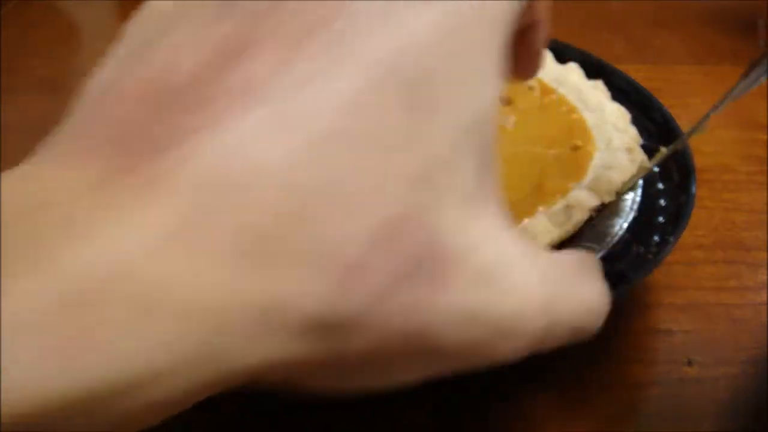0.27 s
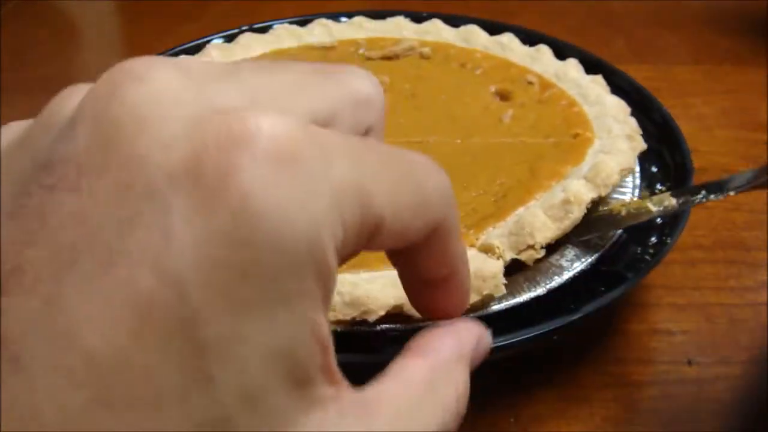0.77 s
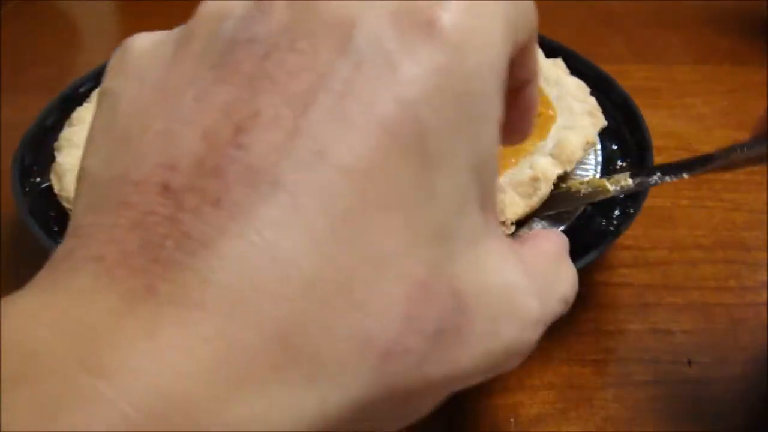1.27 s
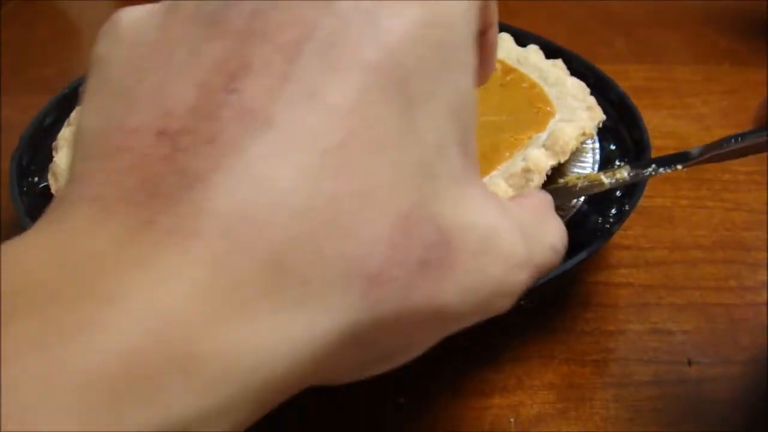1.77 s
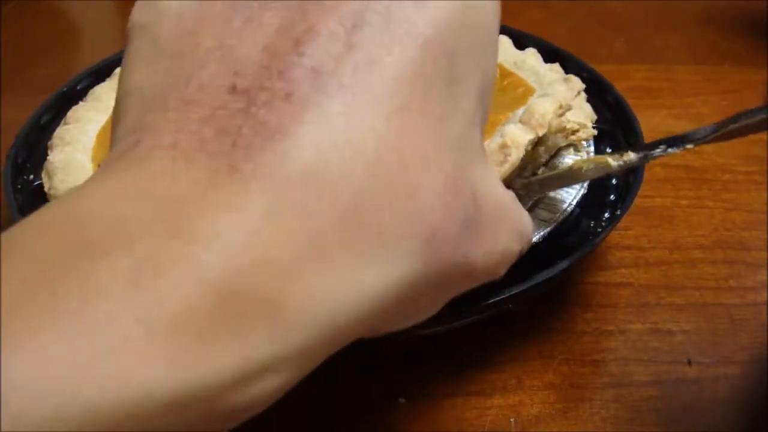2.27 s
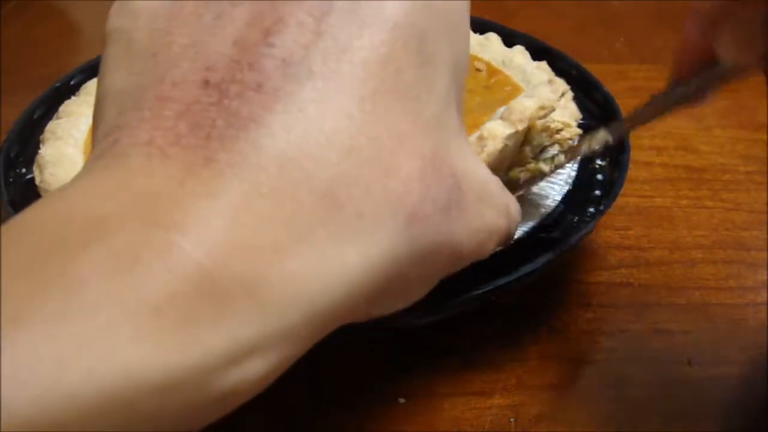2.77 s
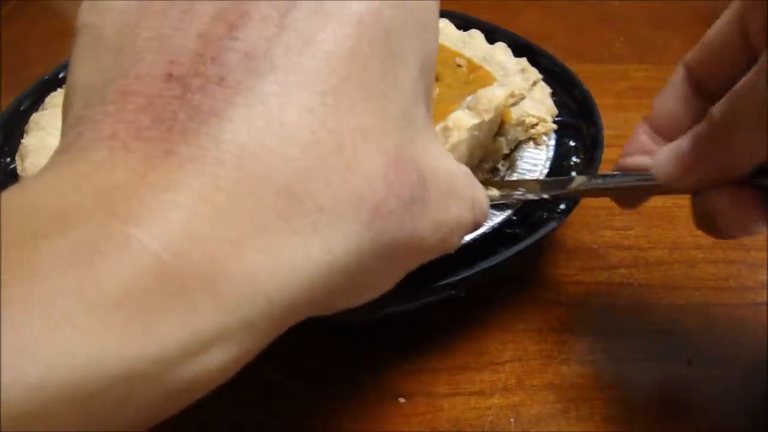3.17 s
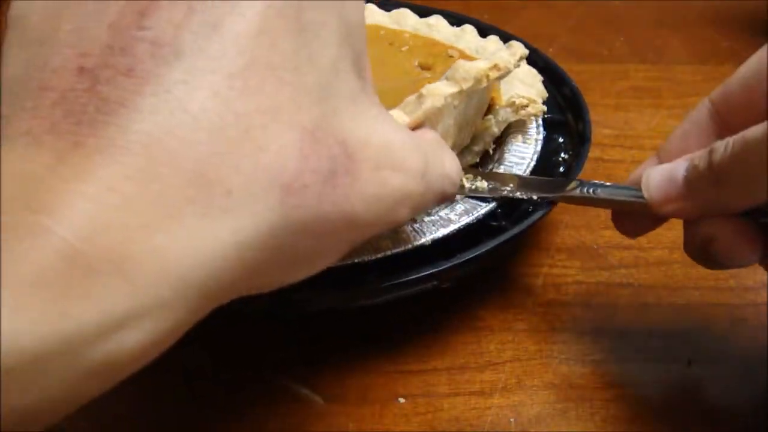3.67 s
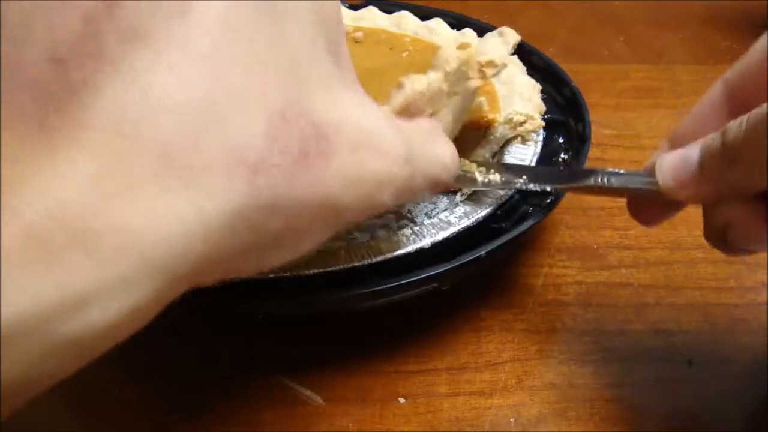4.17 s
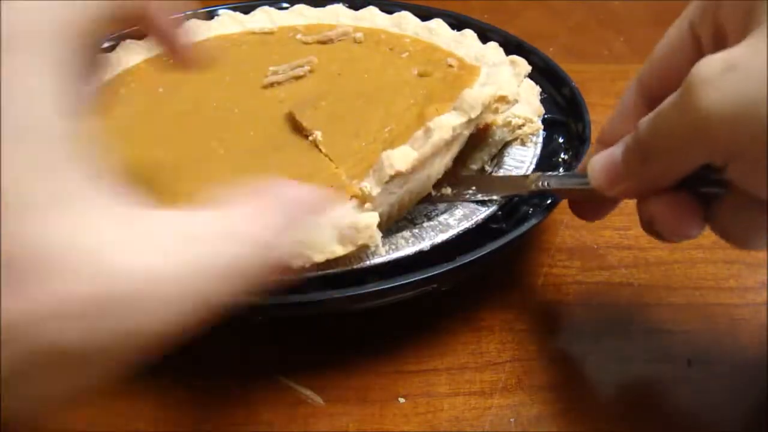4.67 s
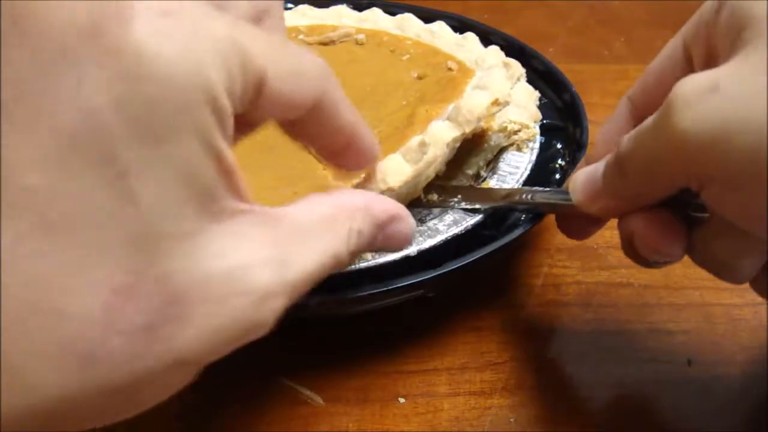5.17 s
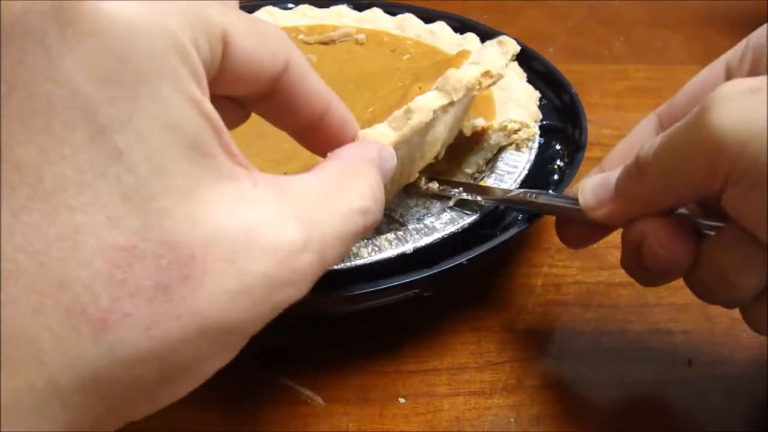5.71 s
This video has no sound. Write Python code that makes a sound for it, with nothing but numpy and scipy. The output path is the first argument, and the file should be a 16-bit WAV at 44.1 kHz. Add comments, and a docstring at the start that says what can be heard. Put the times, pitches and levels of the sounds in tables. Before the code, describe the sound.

A knife works under a pie in a foil pan on a plastic tray, heard very close in a quiet, lightly reverberant room. Small tinny taps and gritty scrapes come in clusters, then two hard clanks just before three seconds, a long soft scrape, crisp foil ticks around four seconds, the loudest clack shortly after, another knock, then near quiet.

```python
"""Hiss and hum of a quiet room, then scrapes, taps and snaps: a knife under a pie in a foil pan on a plastic tray.
Blade: stick-slip clicks and single blows drive the damped modes of the pan, which colour both.
Foil unsticks in bright decaying ticks; dull low thumps come at the loudest blows and about 37 ms after them;
the tray groans in soft low tones. Hiss is shaped noise; appliance hum is wavering sines.
A small camera close by clips and cuts the top."""
import sys
import numpy as np
from scipy import signal
from scipy.fft import rfft, irfft
from scipy.io import wavfile
from scipy.ndimage import uniform_filter1d

SR = 44100
rng = np.random.default_rng(int(sys.argv[2]) if len(sys.argv) > 2 else 0)


def master_out(mix):
    """Clip the mix to full scale and print it as 16-bit PCM to the path in sys.argv[1]."""
    frames = np.transpose(np.atleast_2d(mix))
    ceiling = np.clip(frames, -1, 1)
    pcm = np.round(ceiling * 32767).astype(np.int16)
    wavfile.write(sys.argv[1], SR, pcm)


N = 262159


def undb(db):
    """dB to gain."""
    return 10 ** (np.asarray(db) / 20)


def unit(x):
    """Scale to rms 1."""
    return x / np.sqrt(np.mean(x ** 2))


def add(out, x, start_s):
    """Mix x into out from start_s."""
    i = int(start_s * SR)
    out[i:i + len(x)] += x[:N - i]


def walk(rate_hz):
    """Random levels, one per 1 / rate_hz, slewed; rms near 1."""
    step = int(SR / rate_hz)
    held = np.repeat(rng.standard_normal(N // step + 1), step)
    return unit(uniform_filter1d(held, step)[:N])


def decay(t, tau_s):
    """Exponential decay."""
    return np.exp(-t / tau_s)


# room and microphone hiss spectrum: [f/Hz, relative density/dB]
HISS_SPECTRUM = [(25, -19), (50, -17), (100, -10), (160, -4), (250, 1.5), (500, 2), (1000, -2.5),
                 (1600, -0.5), (2050, -9.5), (3200, -8.5), (5000, -12), (8000, -13.5), (11000, -17)]
HISS_DB_RMS = -53.5


def hiss():
    """Noise shaped by a smooth spectrum; its level breathes."""
    f_hz, density_db = np.transpose(HISS_SPECTRUM)
    bin_hz = np.fft.rfftfreq(N, 1 / SR) + 1  # +1 avoids log(0)
    gain = undb(np.interp(np.log(bin_hz), np.log(f_hz), density_db))
    noise = unit(irfft(rfft(rng.standard_normal(N)) * gain, N))
    return noise * undb(HISS_DB_RMS + 0.5 * walk(2.98))


# steady appliance tones: [f/Hz, mean level/dB rms]
HUM_TONES = [(120, -70), (240, -70), (1200, -71), (1920, -71), (2040, -64), (7854, -73.5), (7881, -80)]


def hum():
    """Sines wavering slightly in pitch and level."""
    out = np.zeros(N)
    for f_hz, level_db in HUM_TONES:
        phase = 2 * np.pi * np.cumsum(f_hz * (1 + 0.000576 * walk(7.8))) / SR
        out += np.sqrt(2) * undb(level_db + 0.93 * walk(12)) * np.sin(phase)
    return out


# dull low thumps, at the loudest blows and about 37 ms after them: [t/s, peak level/dB]
LOW_THUMPS = [(2.93, -28), (2.965, -28), (4.418, -30), (4.456, -29.5)]


def thumps():
    """One soft 1.2 ms pulse each."""
    out = np.zeros(N)
    for t_s, peak_db in LOW_THUMPS:
        add(out, -undb(peak_db) * np.hanning(int(0.0012 * SR)), t_s)
    return out


# tray flexing: [t/s, length/s, f/Hz, level/dB (half of peak amplitude)]
TRAY_GROANS = [(2.765, 0.1, 263, -49.5), (1.215, 0.076, 308, -55), (4.59, 0.068, 290, -55)]


def groans():
    """Low tones of unsteady phase that swell and fade."""
    out = np.zeros(N)
    for t_s, length_s, f_hz, level_db in TRAY_GROANS:
        t = np.arange(int(length_s * SR)) / SR
        drift_cycles = np.cumsum(0.0041 * rng.standard_normal(len(t)))
        tone = np.sin(2 * np.pi * (f_hz * t + drift_cycles))
        add(out, undb(level_db) * 2 * np.hanning(len(t)) * tone, t_s)
    return out


# foil letting go of the crust: [t/s, peak level/dB, f/Hz]
FOIL_TICKS = [(2.165, -26.5, 6840), (3.5633, -35, 3400), (3.7279, -28.5, 3080), (3.909, -29.5, 3460),
              (3.9521, -32, 4240), (3.9697, -37, 4340), (3.9895, -25.5, 8150), (4.0327, -30, 6780),
              (4.098, -30.5, 3270)]


def ticks():
    """Bright snaps: a sine decaying within a cycle or two, plus short noise."""
    out, t = np.zeros(N), np.arange(256) / SR
    for t_s, peak_db, f_hz in FOIL_TICKS:
        snap = np.sin(2 * np.pi * f_hz * t) * decay(t, 0.77 / f_hz)
        snap += 0.29 * rng.standard_normal(256) * decay(t, 0.0014)
        add(out, undb(peak_db) * snap / np.abs(snap).max(), t_s)
    return out


def ring(x, f_hz, t60_s):
    """One decaying mode driven by x: a complex one-pole resonator."""
    pole = np.exp(2j * np.pi * f_hz / SR - np.log(1000) / (t60_s * SR))
    return signal.lfilter([1], [1, -pole], x).imag


# pan and tray modes, damped by the pie: [f/Hz, level/dB, t60/s before each contact scales it]
PAN_MODES = [(402, -8, 0.035), (636, -9, 0.012), (790, 4.5, 0.022), (900, 1, 0.034), (974, -2.5, 0.064),
             (1442, -6, 0.024), (1563, 3, 0.02), (1717, -2.5, 0.019), (2027, -0.5, 0.016),
             (2194, -2, 0.015), (2375, 4, 0.011), (2706, 1.5, 0.01), (3000, -17, 0.0071), (3460, 6, 0.0062),
             (4070, -4, 0.0087), (4430, -5.5, 0.0074), (5060, -1, 0.0036), (6260, 0.5, 0.0026),
             (7920, -7.5, 0.003), (9030, -8.5, 0.0031)]
# edges of the low, middle, upper and treble mode groups: [f/Hz]
GROUP_EDGES_HZ = [340, 1200, 1950, 3300, 12000]


def pan(pushes, t60_scale, spot_db, colour_db):
    """Ring four mode groups, one push each; spot_db sets each mode's drive, colour_db the group mix."""
    groups = np.zeros((len(pushes), len(pushes[0])))
    for (f_hz, level_db, t60_s), here_db in zip(PAN_MODES, spot_db):
        k = np.searchsorted(GROUP_EDGES_HZ[1:], f_hz)
        groups[k] += undb(level_db + here_db) * ring(pushes[k], f_hz, t60_s * t60_scale)
    # a group radiates little away from its modes
    bands = [signal.butter(2, edges, "band", fs=SR, output="sos")
             for edges in zip(GROUP_EDGES_HZ, GROUP_EDGES_HZ[1:])]
    low, mid, upper, treble = (unit(signal.sosfilt(b, g)) for b, g in zip(bands, groups))
    low_gain, upper_gain, treble_gain = (undb(db) for db in colour_db)
    return mid + low * low_gain + upper * upper_gain + treble * treble_gain


# notes the pan favours as blade and pie shift: [t/s, low f/Hz, upper f/Hz, treble f/Hz]
PAN_NOTES = [(0.12, 820, 2500, 8500), (0.15, 816, 2600, 3970), (0.7, 814, 2600, 4230),
             (0.78, 790, 2080, 4000), (0.86, 840, 2600, 4530), (0.97, 860, 2650, 3800),
             (1.2, 860, 2130, 4070), (1.8, 900, 2360, 4100), (2.06, 940, 2200, 6000),
             (2.09, 810, 2170, 6000), (2.18, 900, 2170, 7460), (2.63, 1000, 2200, 4550),
             (2.75, 915, 2150, 8500), (2.82, 790, 2220, 3800), (2.93, 790, 2150, 7900),
             (3.02, 940, 2230, 3800), (3.4, 950, 2560, 3800), (4.02, 970, 2190, 4620),
             (4.42, 1030, 2200, 5000), (4.44, 1000, 2450, 4000), (4.575, 807, 2230, 3720),
             (4.7, 810, 2310, 4300), (5.3, 900, 2250, 4200)]
# low, upper, treble groups: lift of a mode on the note, and reach
FAVOUR_DB, FAVOUR_OCTAVES = (11, 11, 6.5), (0.16, 0.24, 0.52)


def favour(t):
    """Lift in dB per mode at times t: modes near a note rise, their group keeps its power."""
    f_hz, level_db, t60_s = np.transpose(PAN_MODES)[:, :, None]
    note_s, *notes_hz = np.transpose(PAN_NOTES)
    out = np.zeros((len(PAN_MODES), len(t)))
    for k, note_hz, lift_db, reach in zip((0, 2, 3), notes_hz, FAVOUR_DB, FAVOUR_OCTAVES):
        group = np.searchsorted(GROUP_EDGES_HZ[1:], f_hz[:, 0]) == k
        octaves_off = np.log2(f_hz[group] / np.interp(t, note_s, note_hz))
        near_db = lift_db * np.exp(-(octaves_off / reach) ** 2)
        power = undb(2 * level_db[group]) * t60_s[group]
        gain = (power * undb(2 * near_db)).sum(axis=0) / power.sum()
        out[group] = near_db - 10 * np.log10(gain)
    return out


# blows on the pan: [t/s, peak level/dB, low/dB, upper/dB, treble/dB (re middle modes), t60 scale]
PAN_TAPS = [(0.117, -31, -7, -4, 8, 0.26), (0.2347, -14, -5, -1, -4, 1.24), (0.5978, -30.5, -3, 4, -4, 1.7),
            (0.7112, -30, -9, 1, -10, 1.2), (0.7184, -19, 1, 6, -7, 1.1), (0.7251, -19.5, -4, 11, -3, 1.8),
            (0.829, -23.5, 1.5, -14, -13, 1), (0.8622, -20.5, -4, 17, 3.5, 1.8),
            (0.9945, -28, -4, -1, -6, 1), (1.0878, -28.5, 2, -4, -11, 1), (1.0981, -19, 1.5, 10, 3, 0.9),
            (1.1516, -22, 9, 2, 3, 0.82), (1.5568, -34, -3.5, -2, -6, 1.1),
            (1.8488, -23.5, 4.5, -2, -11, 1.2), (1.8583, -23.5, 5, 0, -2, 0.92),
            (1.9084, -30.5, 10, -5, -10, 1), (1.919, -23.5, -3, -5, -16, 0.82),
            (1.928, -31, -5, 3, -16, 1.5), (1.991, -24.5, 2.5, -4, -12, 0.95),
            (2.055, -20, -9, -4.5, -15.5, 0.92), (2.0896, -33, 8, 0, -7, 1.1),
            (2.1756, -22, 3.5, -2, -12, 0.87), (2.1883, -26, -6, 7, 7.5, 0.77),
            (2.2374, -31, -5, -2, -5, 0.99), (2.6077, -23, -14, -2, -18, 1.7),
            (2.667, -24, -17, 2, -24, 0.9), (2.7435, -6.5, -9.5, 2, -8.5, 1.7),
            (2.785, -27.5, 16, -2, -6, 1.7), (2.807, -28, -4, 6, -8, 1.5), (2.818, -28.5, 12, 0, -7, 1.2),
            (2.921, -26, 16, 1, -8, 1.2), (2.9293, -5, -9.5, 5.5, -2.5, 0.61),
            (2.952, -19.5, 2, -4, -11, 0.61), (3.1295, -28, -4, 6, -15, 0.9), (3.7507, -35.5, 0, 9, 5, 0.9),
            (4.4173, -0.5, -11, 0.5, -12, 0.78), (4.5784, -13.5, 3.5, 2.5, 1, 0.86),
            (4.617, -27, 8, -6, -3.5, 1.4), (4.631, -29, 9, -1, -10, 1),
            (4.919, -27.5, -14, -7.5, -30.5, 0.77), (5.2873, -32.5, 9, 12, 0, 1.3),
            (5.4649, -40, 10, -10, -8, 1)]
SWING_S = 0.0058  # push on the low note as the loaded floor swings, stronger under a dull blow


def taps():
    """Contact, rebound and fading chatter ring the pan; a short foil crack drives the treble modes."""
    out, t = np.zeros(N), np.arange(int(0.1 * SR)) / SR
    tap_s = np.transpose(PAN_TAPS)[0]
    spots_db = 2.4 * rng.standard_normal((len(PAN_TAPS), len(PAN_MODES))) + favour(tap_s).T
    for (t_s, peak_db, *colour_db, t60_scale), spot_db in zip(PAN_TAPS, spots_db):
        chatter = rng.standard_normal(len(t))
        push = 0.047 * chatter * decay(t, 0.0028)
        push[0] -= 1  # contact
        push[int(0.0019 * SR)] -= 0.35  # rebound
        crack = push + 0.19 * chatter * decay(t, 0.0018)
        note_hz = np.interp(t_s, *np.transpose(PAN_NOTES)[:2])
        swell = np.sin(np.pi * np.minimum(t / SWING_S, 1)) ** 0.5
        swing = -np.cos(2 * np.pi * note_hz * t) * swell
        low_push = push + 0.019 * min(undb(colour_db[0]), 1.6) * swing
        blow = pan([low_push, push, push, crack], np.clip(t60_scale, 0.2, 2), spot_db, colour_db)
        add(out, undb(peak_db) * blow / np.abs(blow).max(), t_s)
    return out


# blade strokes: [t/s at full pressure, swell/s, hold/s, fade/s, middle modes level/dB,
# low/dB, upper/dB, treble/dB (re middle modes)]; swell and fade span STROKE_DB, at least 3 ms
BLADE_STROKES = [(0.148, 0.051, 0.2, .05, -51.5, -3, 6.5, 1), (0.24, 0.022, 0.0018, 0.15, -45.5, -1, 5, 2),
                 (0.613, 0.16, 0.022, .1, -56, 0.5, 0.5, -9), (0.676, .03, 0.047, .05, -52, 1, 7, -11),
                 (0.71, 0.024, 0.016, 0.0056, -41.5, -1.5, 6.5, -3),
                 (0.75, .1, 0.00032, 0.17, -49, 2, 0, -7), (0.832, 0.011, 0, 0.051, -44, 4, -3, -11),
                 (0.869, 0.024, 0.015, 0.13, -47.5, 3, 4.5, 0.5),
                 (0.953, 0.08, 0.011, .02, -48, 1.5, 8.5, -2),
                 (1.095, 0.015, 0.0017, 0.048, -37, 0.5, -3, -7.5),
                 (1.136, 0.043, 0.025, .01, -47.5, 7.5, 3, 2),
                 (1.151, 0.009, 0.055, 0.11, -38.5, 2.5, 3.5, -0.5),
                 (1.214, 0.089, 0.04, 0.16, -40.5, -1, 0, -1.5),
                 (1.702, 0.062, 0.016, 0.058, -52, -2.5, -2, -5), (1.857, 0.016, 0, 0.034, -41, -4, 0, -15),
                 (1.922, .06, 0, 0.049, -43.5, -1, 0, -14), (2.001, 0.061, 0, .05, -49.5, 7, 5, -8),
                 (2.059, .06, 0.019, 0.18, -53, 1.5, -4, -6.5),
                 (2.184, 0.038, 0, 0.062, -41.5, -2.5, 0, -3),
                 (2.247, 0.085, 0.003, 0.035, -47, 0.5, 0.5, -2.5),
                 (2.477, 0.21, 0.012, 0.27, -52, -4.5, -5, -6.5),
                 (2.611, 0.01, 0.063, 0.024, -37, -2, -0.5, -12),
                 (2.747, 0.0077, 0.0028, .055, -36, -10, -1, -5),
                 (2.774, .04, 0.049, 0.068, -43.5, 0.5, 3.5, -2.5),
                 (2.85, .06, 0.064, .05, -44.5, 0.5, 2, -2),
                 (2.938, 0.042, 0.014, 0.16, -41, 0.5, 4.5, -3.5),
                 (3.177, 0.3, 0.052, 0.17, -43.5, -1, 0, -3), (3.282, 0.21, 0.1, 0.039, -45, -0.5, 2, -0.5),
                 (4.023, 0.072, 0, 0.079, -52, 3.5, -7, -4), (4.234, 0.098, 0, 0.057, -45, -2, -2.5, -10.5),
                 (4.332, 0.025, 0, 0.044, -45.5, -5, -3, -17), (4.42, 0.02, 0.06, 0.19, -40, -9.5, 0.5, -9),
                 (4.618, 0.075, 0.0094, 0.064, -42.5, 3, -2, -5),
                 (4.672, .1, 0.054, 0.044, -47, -8, -4, -8.5),
                 (5.222, 0.51, 0.011, 0.16, -52, -1, -2.5, -6), (5.462, .1, 0, .04, -58, 0, -5, -15)]
# blade resting on foil between strokes: [middle modes level/dB, low/dB, upper/dB, treble/dB (re middle)]
BLADE_RESTING = (-65.5, 4, 3.5, 1)
STROKE_DB, SAG_DB_PER_S = 20, 23  # sag: pressure eases during hold


def pressure():
    """Middle level and group colours in dB: strokes swell, hold and fade; powers add to the resting blade."""
    t = np.arange(N) / SR
    rest_db, *rest_colour_db = BLADE_RESTING
    power = np.ones((1, N)) * undb(2 * (rest_db + np.array([0, *rest_colour_db])))[:, None]
    for t_s, swell_s, hold_s, fade_s, level_db, *colour_db in BLADE_STROKES:
        start = max(int((t_s - 2 * swell_s) * SR), 0)
        near = slice(start, int((t_s + hold_s + 2 * fade_s) * SR))
        since = t[near] - t_s
        swell_db = STROKE_DB * np.minimum(since, 0) / max(swell_s, 0.003)
        sag_db = SAG_DB_PER_S * np.clip(since, 0, max(hold_s, 0))
        fade_db = STROKE_DB * np.maximum(since - hold_s, 0) / max(fade_s, 0.003)
        shape_db = swell_db - sag_db - fade_db
        power[:, near] += undb(2 * (level_db + shape_db + np.array([0, *colour_db])[:, None]))
    groups_db = 10 * np.log10(power)
    return groups_db[0], groups_db[1:] - groups_db[0]


def slips():
    """Stick-slip clicks, about 2000 per s, of random sign and uneven size."""
    size_db = np.minimum(2.33 * rng.exponential(size=N), 13)
    hits = rng.random(N) < 2000 / SR
    return unit(hits * rng.choice([-1, 1], N) * undb(size_db))


def scrape():
    """Blade slips over ribbed foil with unsteady grip; each mode group gets shared plus own slips."""
    shared, grip_db = slips(), 0.83 * walk(160)
    pushes = [(0.88 * shared + slips()) * undb(grip_db + 1.05 * walk(120)) for _ in GROUP_EDGES_HZ[1:]]
    level_db, colour_db = pressure()
    return undb(level_db) * pan(pushes, 0.64, favour(np.arange(N) / SR), colour_db)


def echo(near):
    """Wall reflections: decaying noise tail, t60 0.93 s, after a 4 ms gap."""
    t = np.arange(int(0.4 * SR)) / SR
    tail = rng.standard_normal(len(t)) * np.exp(-np.log(1000) * t / 0.93) * (t > 0.004)
    return undb(-15) * signal.fftconvolve(near, tail / np.linalg.norm(tail))[:N]


def scene():
    """Background, thumps and groans, then contacts with their echo."""
    background = hiss() + hum()
    near = ticks() + taps() + scrape()
    return (background + thumps() + groans() + near + echo(near))[None]


def record(dry):
    """The camera clips at full scale, then cuts above 11090 Hz."""
    lowpass = signal.ellip(12, 0.2, 60, 11090, fs=SR, output="sos")
    return signal.sosfilt(lowpass, np.clip(dry, -1, 1))


dry = scene()
out = record(dry)
master_out(out)
```